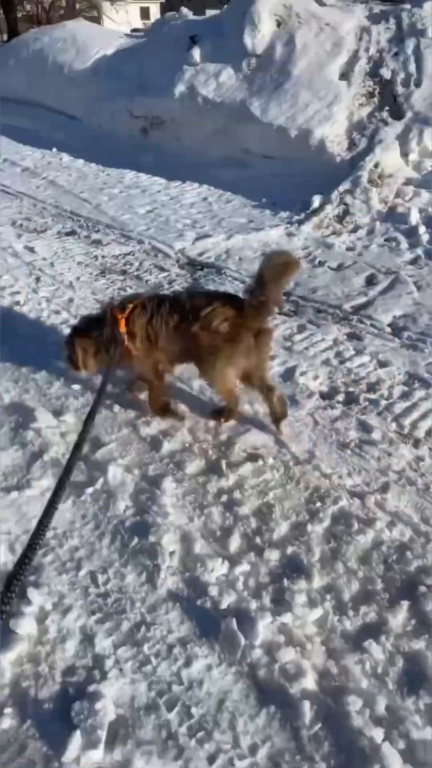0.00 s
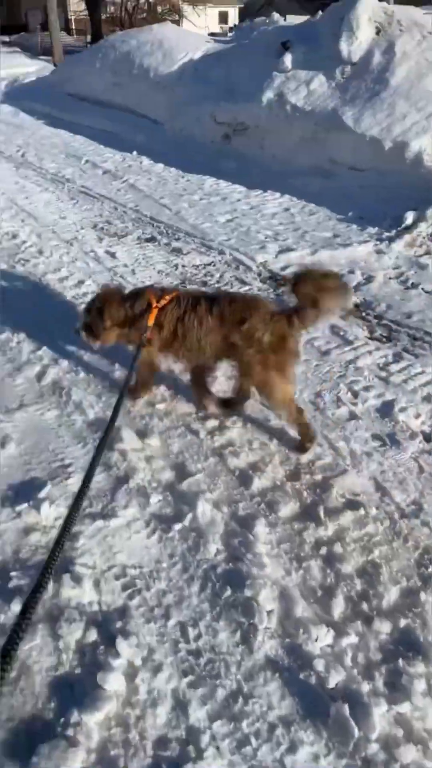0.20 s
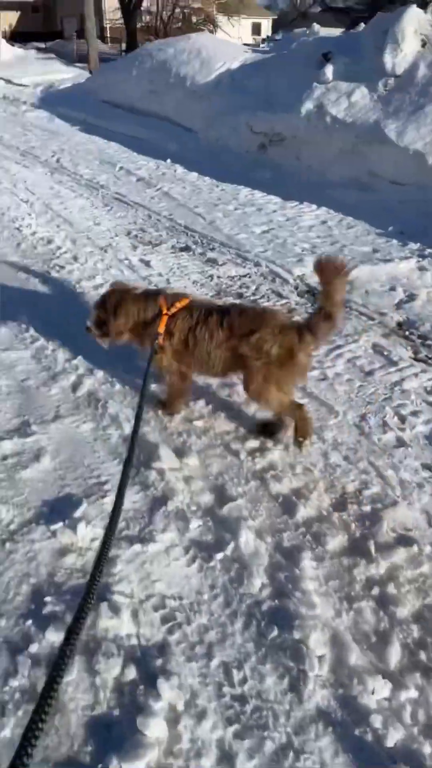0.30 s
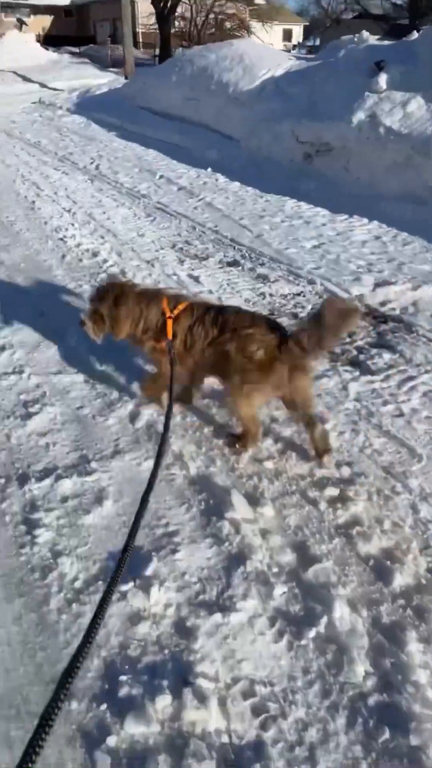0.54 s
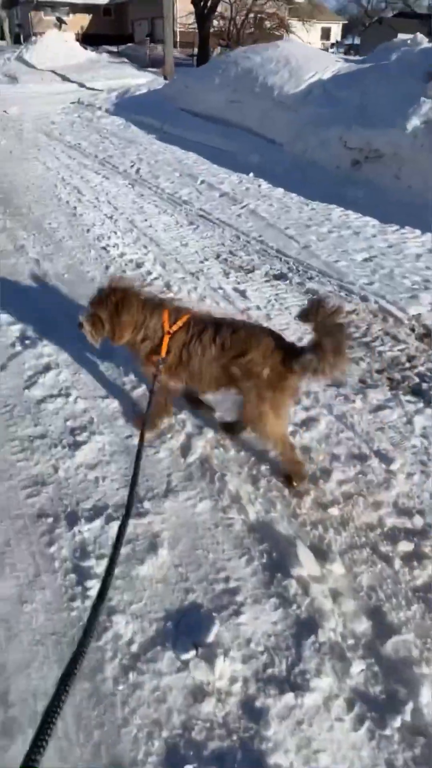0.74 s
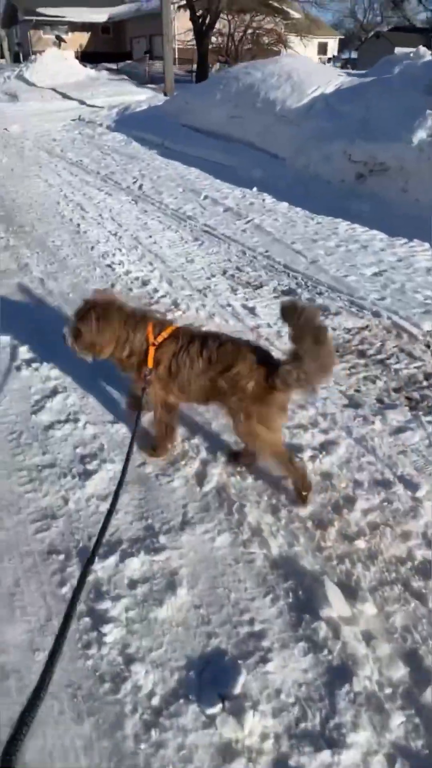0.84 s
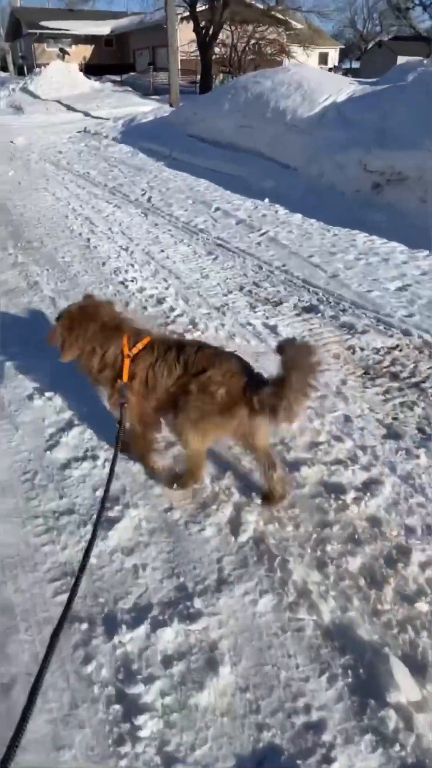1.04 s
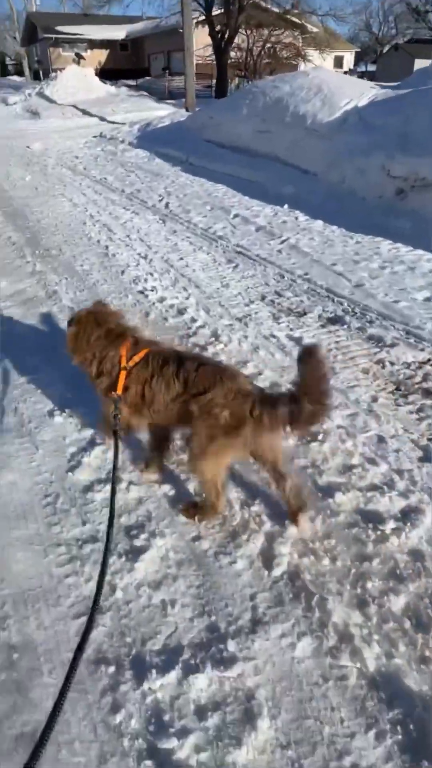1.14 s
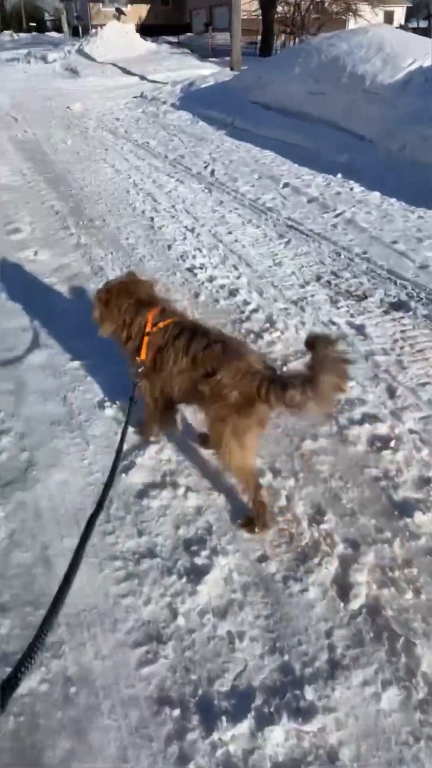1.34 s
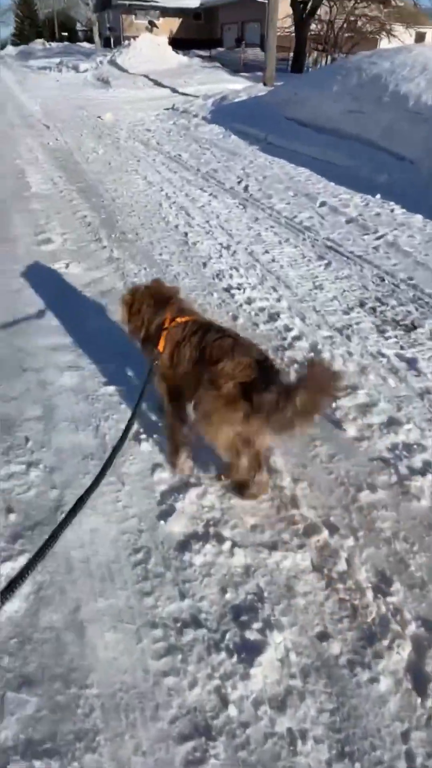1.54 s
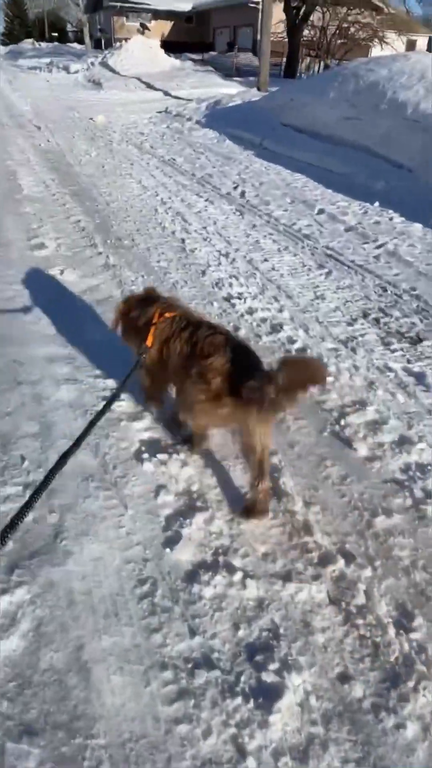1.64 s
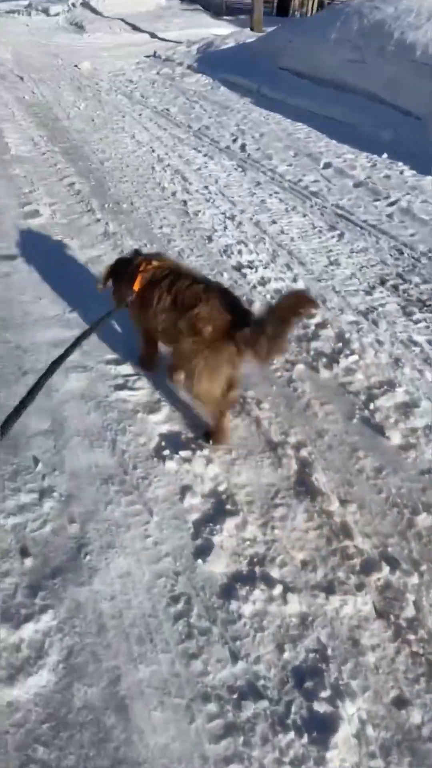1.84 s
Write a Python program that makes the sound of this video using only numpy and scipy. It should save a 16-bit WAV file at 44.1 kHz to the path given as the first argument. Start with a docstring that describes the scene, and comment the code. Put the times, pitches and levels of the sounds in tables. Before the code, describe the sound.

Boots crunch through crusty snow at walking pace, close and dry, with quiet open air behind

```python
"""Boots tread on cold packed snow, heard from a phone in the walker's hand.
The crust snaps in short decaying tones; loose crystals spray as bursts of bright random clicks; soles thud dully
in low short tones. A fine crackle of random grains in noise bands follows the load on the snow.
Below lie a low outdoor rumble and air: noise bands with a few bumps."""
import sys
import numpy as np
from scipy import signal
from scipy.io import wavfile

SR = 44100
rng = np.random.default_rng(int(sys.argv[2]) if len(sys.argv) > 2 else 0)


def amplitude_ratio(level_db):
    """Convert a level in decibels to the matching linear amplitude (field) ratio."""
    exponent = np.asarray(level_db, float) / 20
    return 10 ** exponent


def pcm_store(signal):
    """Save signal as 16-bit PCM."""
    levels = np.round(np.clip(np.atleast_2d(signal), -1, 1) * 32767)
    wavfile.write(sys.argv[1], SR, levels.astype(np.int16).T)


N = 81585
t = np.arange(N) / SR

# snaps of the crust: t/s, peak level/dB, f/Hz, width at half height/ms
CRUST_CRACKS = [(0.2396, -1, 1730, 0.57), (0.2523, -21.5, 1430, 1), (0.3042, -15.5, 1460, 0.88),
                (0.381, -23.5, 2500, 0.44), (0.436, -10, 3200, 0.74), (0.4385, -28, 2700, 0.7),
                (0.4411, -29, 2900, 0.46), (0.4432, -10.5, 2870, 0.8), (0.4559, -9, 1820, 0.84),
                (0.4593, -13.5, 1354, 3.8), (0.4638, -5, 1110, 1.07), (0.4696, -0.5, 1140, 1.49),
                (0.4727, -4, 1420, 0.86), (0.4762, -6.5, 1610, 1.34), (0.502, -23.5, 1590, 1.4),
                (0.5065, -23, 1250, 1.7), (0.5281, -14.5, 2270, 0.46), (0.5293, -21, 734, 1.7),
                (0.5328, -11, 1950, 0.6), (0.5352, -18.5, 3120, 0.8), (0.5533, -15.5, 790, 0.74),
                (0.711, -19.5, 1900, 0.28), (0.7667, -25.5, 1410, 0.56), (0.7806, -30.5, 840, 1.9),
                (0.8092, -20, 1840, 0.32), (0.881, -23.5, 2800, 0.89), (0.8914, -17, 1570, 0.53),
                (0.917, -10, 1420, 0.59), (0.9255, -5, 1340, 0.72), (0.9477, -13.5, 1020, 0.82),
                (0.9835, -28.5, 1270, 2.2), (1.0086, -13.5, 2550, 0.93), (1.0101, -14, 840, 1.05),
                (1.0465, -22.5, 2810, 0.99), (1.0612, -20, 1330, 1.1), (1.0658, -14, 1600, 1.6),
                (1.0694, -23, 1170, 1.8), (1.0729, -15.5, 1450, 1.7), (1.0767, -23, 1110, 1.7),
                (1.0826, -16, 1950, 0.85), (1.0869, -22, 1260, 1.5), (1.1006, -19, 1250, 1),
                (1.43, -26, 2050, 0.3), (1.4413, -24.5, 1840, 0.51), (1.5703, -14, 3800, 0.6),
                (1.5871, -16.5, 3200, 0.82), (1.6121, -20, 1470, 0.84), (1.6157, -25, 1590, 0.87),
                (1.6238, -25, 1480, 0.56), (1.6489, -16, 5930, 0.43), (1.6494, -15, 1220, 1),
                (1.6725, -20, 1100, 1.4), (1.6755, -16, 3520, 0.32), (1.6765, -16, 1010, 1.1),
                (1.6857, -20, 1270, 0.94), (1.7552, -21.5, 1340, 0.29)]
# bursts of loose crystals: t/s, level/dB, centre f/Hz, width at half height/ms
CRYSTAL_SPRAYS = [(0.024, -32, 6700, 12.6), (0.1962, -34.5, 7540, 5.6), (0.2341, -29.5, 7900, 8.2),
                  (0.457, -26.5, 7000, 7), (0.491, -28.5, 8300, 4.2), (0.4996, -30, 7500, 5.6),
                  (0.529, -31, 8900, 4.4), (0.542, -30.5, 5950, 3.2), (0.667, -34, 5430, 2.2),
                  (0.8246, -28.5, 8900, 2.2), (0.8321, -30, 7200, 5.1), (0.9138, -18, 6100, 1.8),
                  (0.9574, -34, 7300, 3.2), (1.15, -43, 5170, 150), (1.3547, -20.5, 7200, 1.04),
                  (1.3983, -24.5, 7640, 1), (1.573, -34, 4000, 50), (1.6491, -29, 7500, 1.06),
                  (1.678, -38.5, 5430, 5.3)]
# dull thuds in the packed layer: t/s, peak level/dB, f/Hz, width at half height/ms
SOLE_THUDS = [(0.374, -35.5, 257, 4.8), (0.4737, -18, 352, 6.9), (0.5327, -24, 320, 1.7),
              (0.5571, -32, 323, 12.4), (0.8486, -31.5, 376, 8.9), (0.9273, -32.5, 308, 8.6),
              (0.9548, -32.5, 310, 8.7), (1.015, -33, 350, 1.9), (1.091, -30, 260, 7),
              (1.3004, -32.5, 304, 5.2), (1.385, -41, 247, 22), (1.447, -36, 248, 14.4),
              (1.5686, -33, 433, 21.5)]
# crackle under the load: t/s, coarse grain level/dB, fine grain level/dB
LOAD_CRACKLE = [(0, -38.5, -36), (0.052, -46.5, -43.5), (.18, -45.5, -43.5), (0.237, -36, -37),
                (.28, -41.5, -40), (0.406, -43, -45), (0.439, -26, -30.5), (0.476, -23.5, -28.5),
                (0.483, -34, -48.5), (0.563, -42.5, -35), (0.632, -51.5, -51), (.72, -49.5, -43),
                (.93, -45, -51.5), (1.0, -49.5, -52.5), (1.034, -40, -47.5), (1.046, -31, -37.5),
                (1.108, -34, -41), (1.15, -44, -44), (1.38, -51, -49), (1.522, -43, -44.5),
                (1.573, -32, -37), (1.62, -36.5, -48.5), (1.7, -43, -45), (1.769, -41, -42),
                (1.79, -55.5, -54.5), (1.85, -53.5, -51.5)]
# colour of the coarse grains: f/Hz, relative level/dB
COARSE_BANDS = [(350, -7), (700, -2.5), (1150, 0.5), (1600, -1.5), (2300, -1.5), (3200, -4.5)]
# colour of the fine grains: f/Hz, relative level/dB
FINE_BANDS = [(4200, 2), (5500, 6), (7800, 9), (10000, -1), (12300, 6), (15300, 1)]
# colour of the outdoor rumble: f/Hz, relative level/dB
RUMBLE_BANDS = [(45, -5), (62, -5.5), (90, -3), (135, -6), (210, -2.5), (330, -7), (500, -2)]
# low bumps of wind or handling: t/s, peak level/dB, f/Hz, width at half height/ms
LOW_BUMPS = [(.565, -39, 65, 14), (.735, -40, 53.3, 23), (.81, -33, 58.7, 13), (1.583, -37.5, 49.6, 17)]


def rms(x):
    """Root mean square over the whole signal."""
    return np.sqrt(np.mean(x ** 2))


def band(x, centre_hz, octaves):
    """Band-pass around centre_hz, scaled to rms 1."""
    edges_hz = centre_hz * 2.0 ** (np.array([-0.5, 0.5]) * octaves)
    edges_hz = np.clip(edges_hz, 10, 0.47 * SR)
    y = signal.sosfilt(signal.butter(2, edges_hz, "band", fs=SR, output="sos"), x)
    return y / rms(y)


def hump(peak_s, width_ms, rise):
    """Envelope with a rounded rise and a drawn-out fall; rise is the rise's share of the half-height width."""
    u = (t - peak_s) / (width_ms / 1000)
    side = np.where(u < 0, rise, 1 - rise)
    power = np.where(u < 0, 2, 1.4)
    return 2.0 ** -(np.abs(u / side) ** power)


def snaps(table, rise, sag):
    """A short tone per event, random in phase; its pitch falls around the peak if sag > 0."""
    out = np.zeros(N)
    for (peak_s, db, hz, width_ms), phase in zip(table, rng.random(len(table))):
        cycles = hz * (t - peak_s)
        bend = sag * np.clip(cycles, -3, 3) ** 2
        out += amplitude_ratio(db) * hump(peak_s, width_ms, rise) * np.cos(2 * np.pi * (cycles - bend + phase))
    return out


def grit(rate_hz, spread_db):
    """Random clicks of either sign, mostly small and a few large."""
    hit, size, sign = rng.random((3, N))
    click = np.clip((rate_hz / SR - hit) * SR / 40, 0, 1)
    rare = np.minimum(-np.log(1 - size), 5)
    return click * amplitude_ratio(spread_db * rare) * np.sign(sign - 0.5)


def crackle(bands, column, rate_hz, spread_db, own, octaves):
    """Grains shared by all bands plus grains of each band alone (gain own), at the level the load gives."""
    shared = grit(rate_hz, spread_db)
    x = np.zeros(N)
    for hz, db in bands:
        alone = band(grit(rate_hz, spread_db), hz, octaves)
        x += amplitude_ratio(db) * (band(shared, hz, octaves) + own * alone)
    load = np.array(LOAD_CRACKLE)
    level_db = np.interp(t, load[:, 0], load[:, column])
    return x / rms(x) * amplitude_ratio(level_db)


def rumble():
    """Far traffic and air: low noise bands, plus bumps as low tones that swell and stop short."""
    noise_db = -48.5  # rms of the noise
    x = sum(amplitude_ratio(db) * band(rng.standard_normal(N), hz, 0.54) for hz, db in RUMBLE_BANDS)
    return amplitude_ratio(noise_db) * x / rms(x) + snaps(LOW_BUMPS, rise=0.96, sag=0)


def sprays():
    """Loose crystals: bursts of band-passed grit, with a glint of high noise from the finest ones."""
    glint_hz, glint_db = 13100, -9  # dB against each spray's level
    glint = amplitude_ratio(glint_db) * band(rng.standard_normal(N), glint_hz, 0.35)
    out = np.zeros(N)
    for peak_s, db, hz, width_ms in CRYSTAL_SPRAYS:
        crystals = band(grit(rate_hz=7000.0, spread_db=3.0), hz, octaves=0.89)
        out += amplitude_ratio(db) * hump(peak_s, width_ms, 0.43) * (crystals + glint)
    return out


def cracks():
    """Crust snaps: a brief bright edge, then a few cycles sagging as the crack opens; bass is cut."""
    edge_db, pitch_ratio, width_ratio = -12, 2.05, 0.76  # edge against its crack
    sag = 0.05
    edges = [(s - 0.46 * ms / 1000, db + edge_db, hz * pitch_ratio, ms * width_ratio)
             for s, db, hz, ms in CRUST_CRACKS]
    x = snaps(CRUST_CRACKS, 0.22, sag) + snaps(edges, 0.16, sag)
    return signal.sosfilt(signal.butter(2, 300, "high", fs=SR, output="sos"), x)


def thuds():
    """Soles on the packed layer: low short tones that sag in pitch."""
    return snaps(SOLE_THUDS, rise=0.25, sag=0.13)


def settling_tail(hits):
    """Snow around the boot: hits convolved with decaying noise."""
    tail_db, t60_s = -9.5, 0.023  # tail energy against the hit
    tail_t = t[:4000]
    tail = rng.standard_normal(len(tail_t)) * np.exp(-np.log(1000) * tail_t / t60_s)
    tail *= amplitude_ratio(tail_db) / np.sqrt(np.sum(tail ** 2))
    return signal.fftconvolve(hits, tail)[:N]


def scene():
    """Hits with their settling tail over crackle and rumble; one channel."""
    coarse = crackle(COARSE_BANDS, column=1, rate_hz=834.0, spread_db=3.5, own=1.85, octaves=0.76)
    fine = crackle(FINE_BANDS, column=2, rate_hz=5100.0, spread_db=5.0, own=0.85, octaves=0.38)
    hits = sprays() + cracks() + thuds()
    return (hits + settling_tail(hits) + coarse + fine + rumble())[None]


def top_cut(x):
    """Nothing passes above the cut-off."""
    return signal.sosfilt(signal.butter(12, 17140, fs=SR, output="sos"), x)


def record(dry):
    """The phone rounds the loudest peaks and cuts the top."""
    top_hz = 15900
    soft = dry / (1 + dry ** 4) ** 0.25
    low_pass = signal.ellip(6, 0.3, 45, top_hz, fs=SR, output="sos")
    return top_cut(signal.sosfilt(low_pass, soft))


dry = scene()
out = record(dry)
pcm_store(out)
```